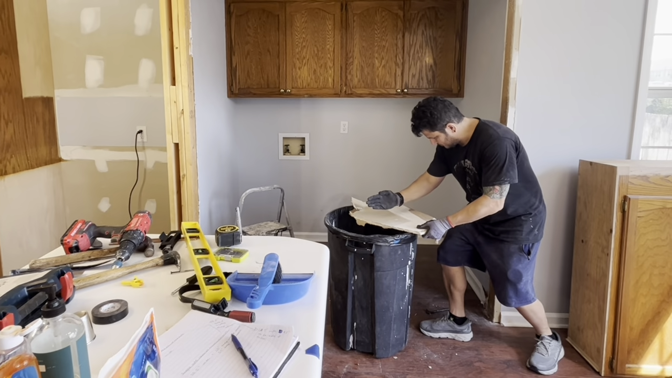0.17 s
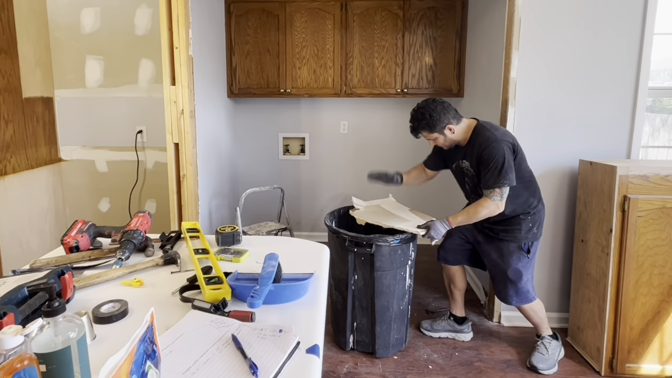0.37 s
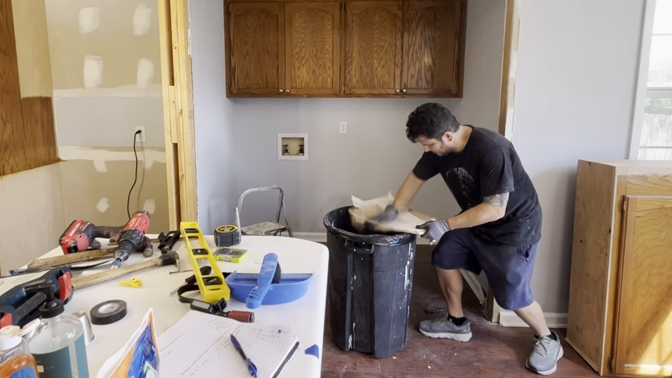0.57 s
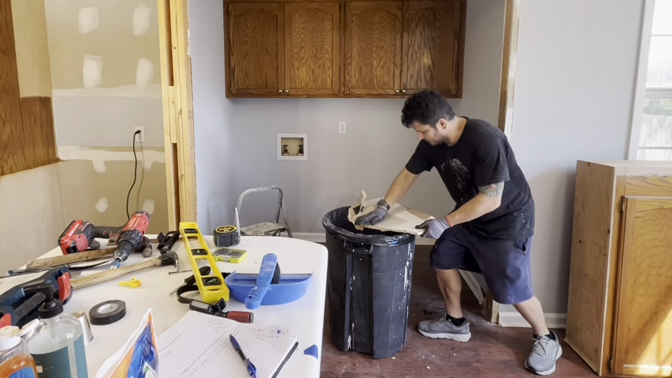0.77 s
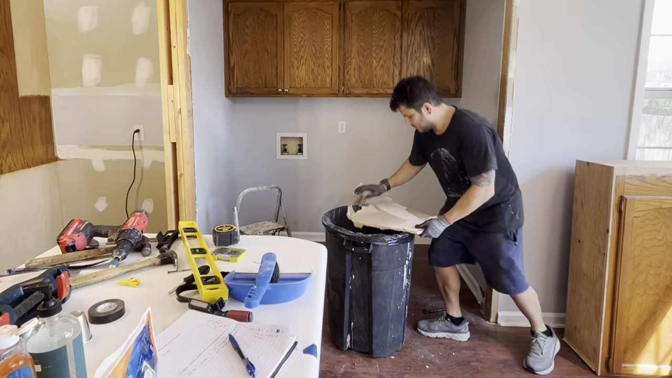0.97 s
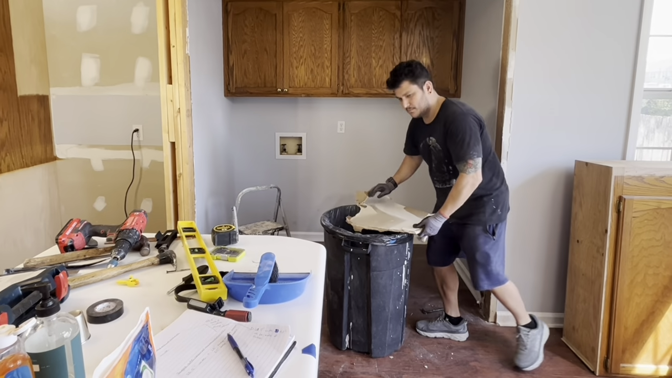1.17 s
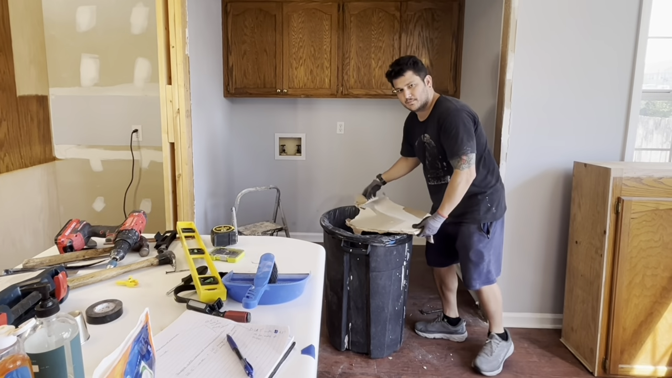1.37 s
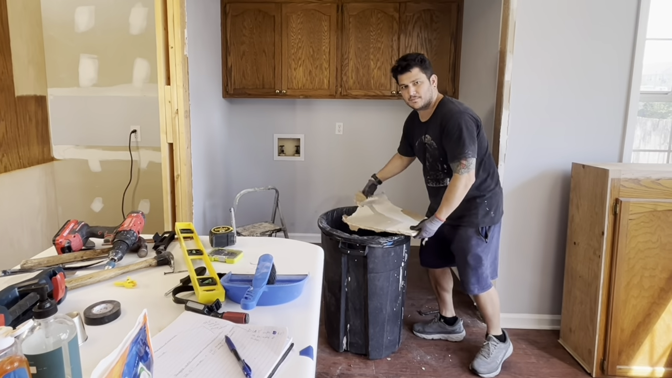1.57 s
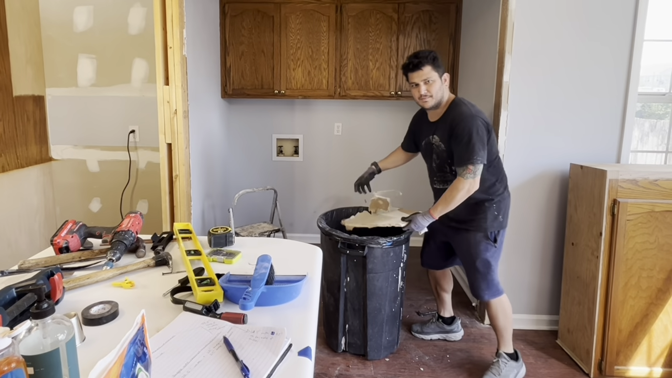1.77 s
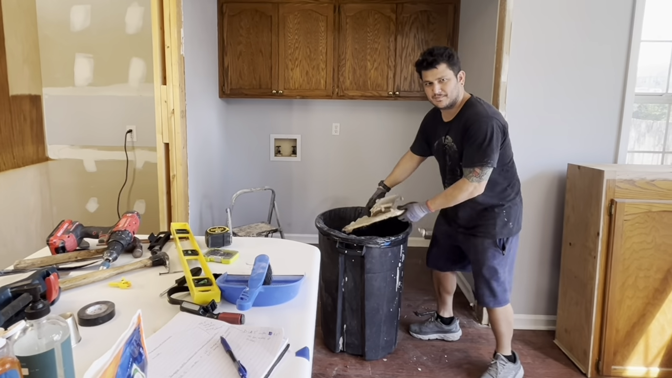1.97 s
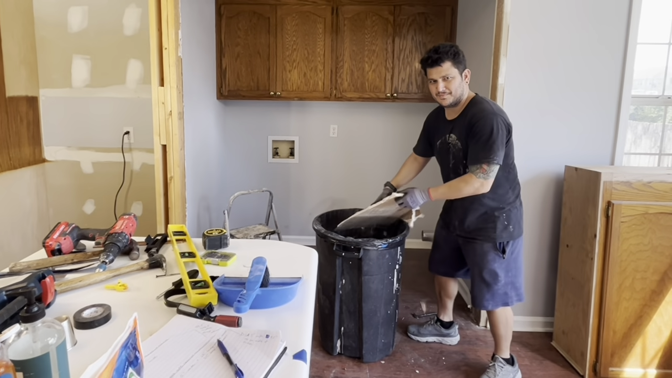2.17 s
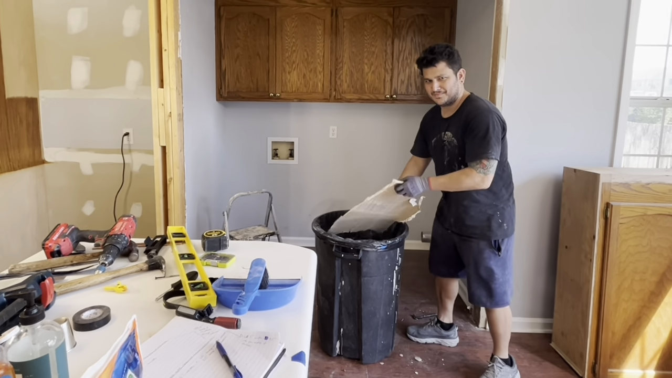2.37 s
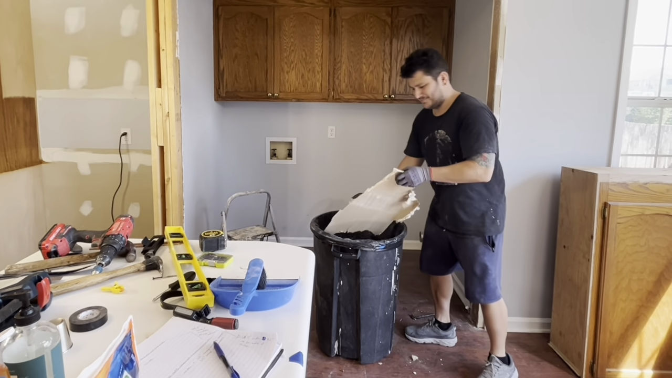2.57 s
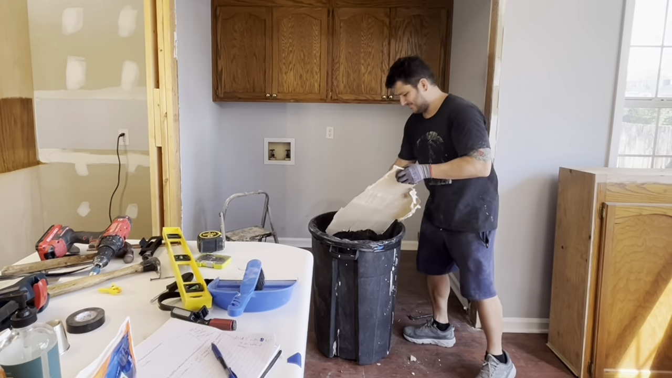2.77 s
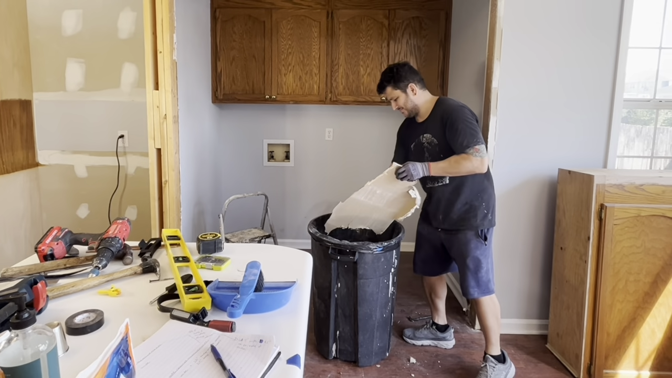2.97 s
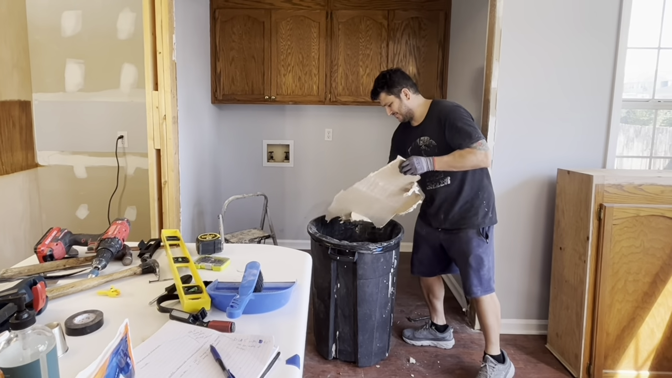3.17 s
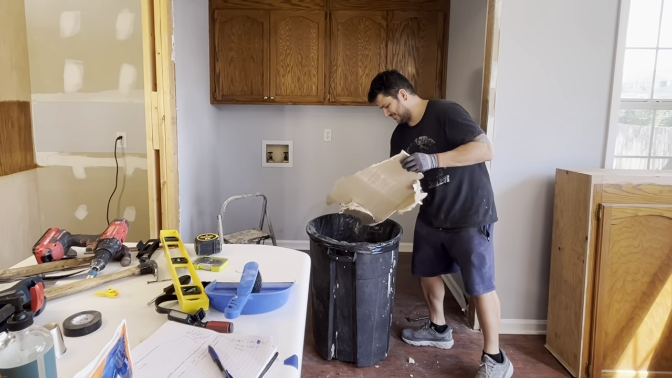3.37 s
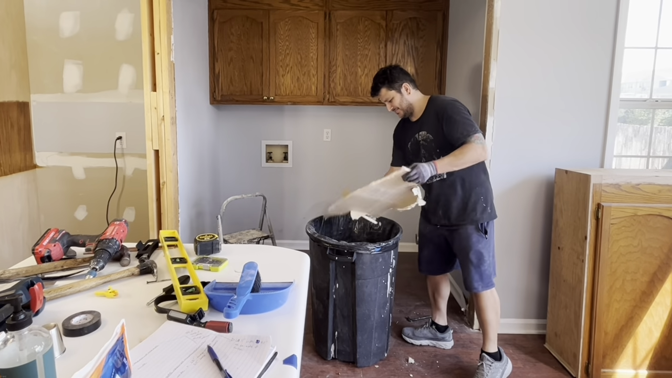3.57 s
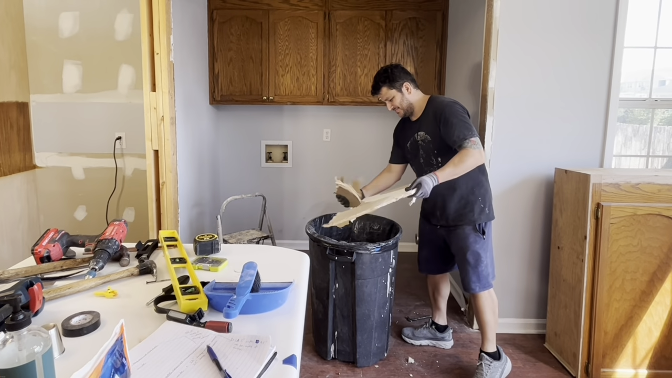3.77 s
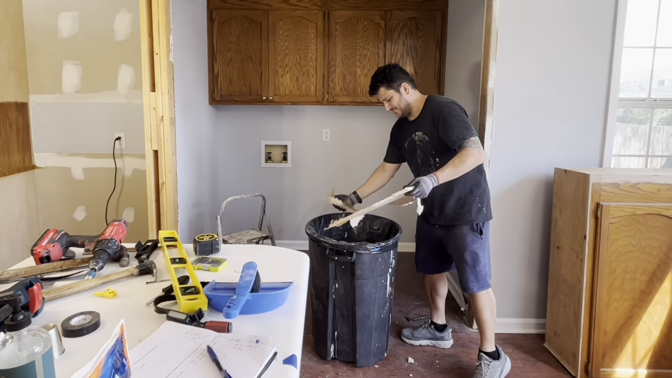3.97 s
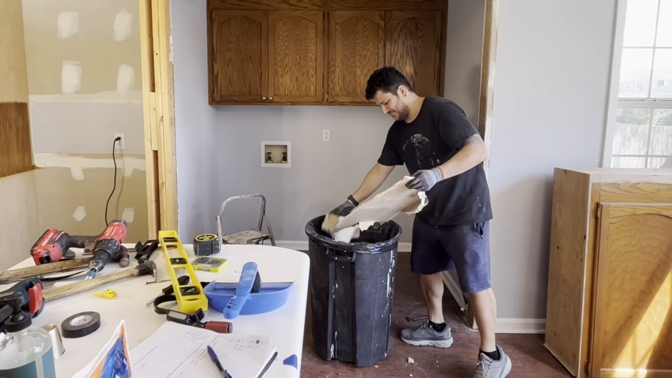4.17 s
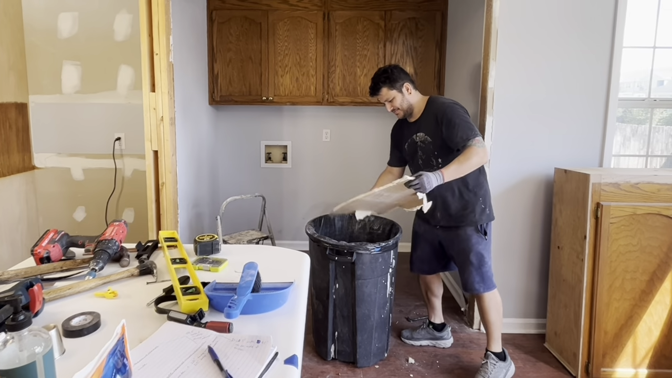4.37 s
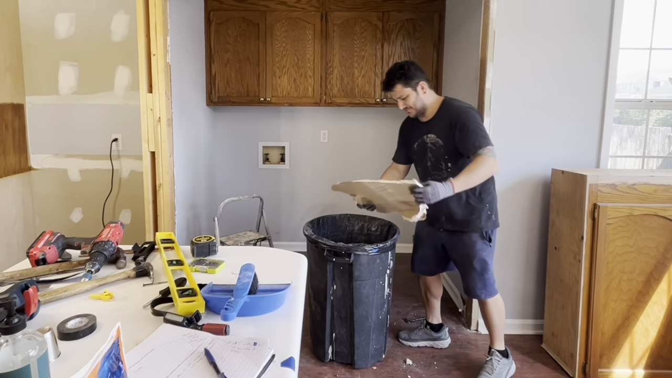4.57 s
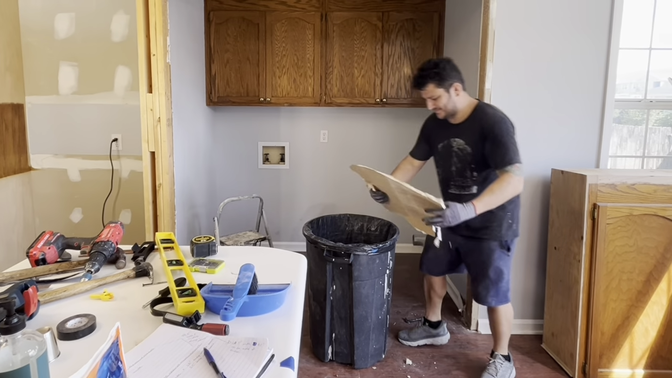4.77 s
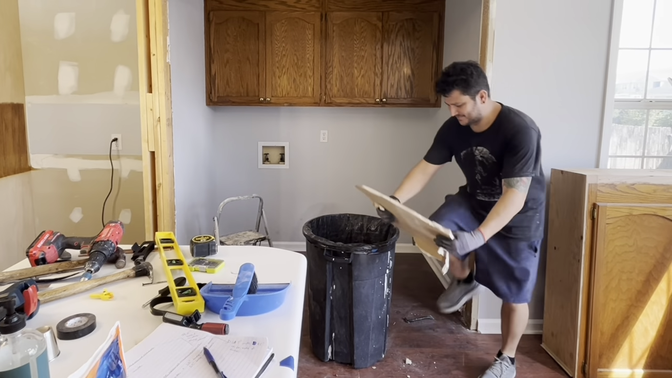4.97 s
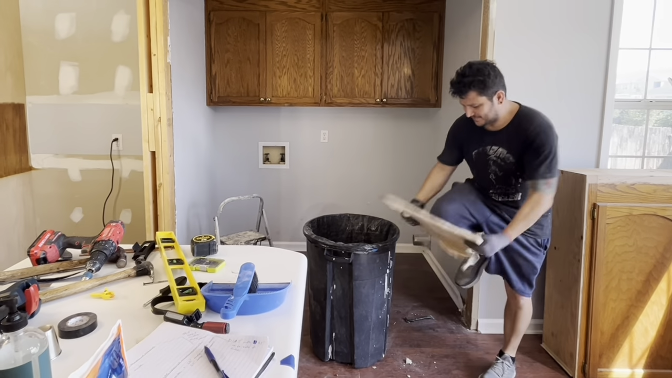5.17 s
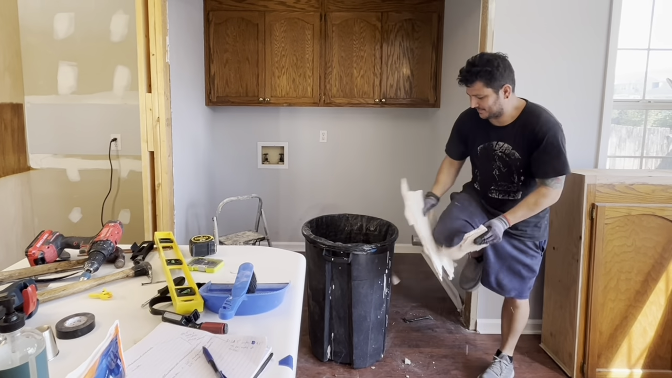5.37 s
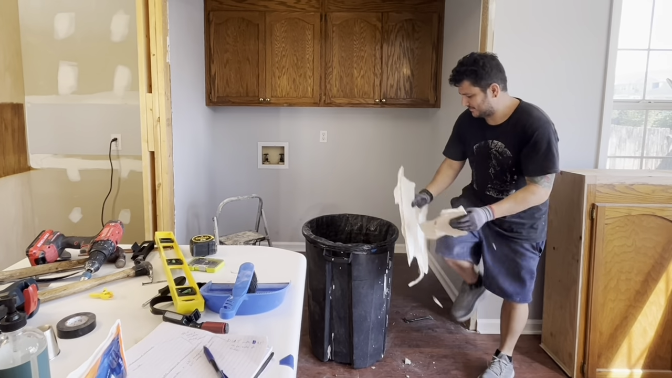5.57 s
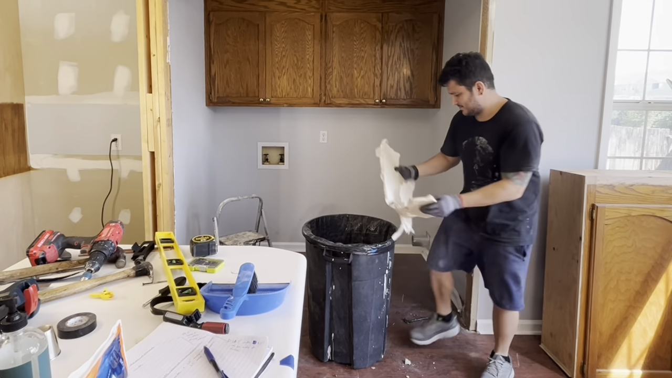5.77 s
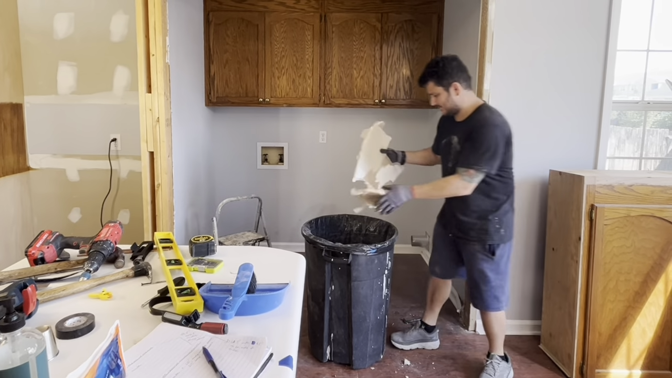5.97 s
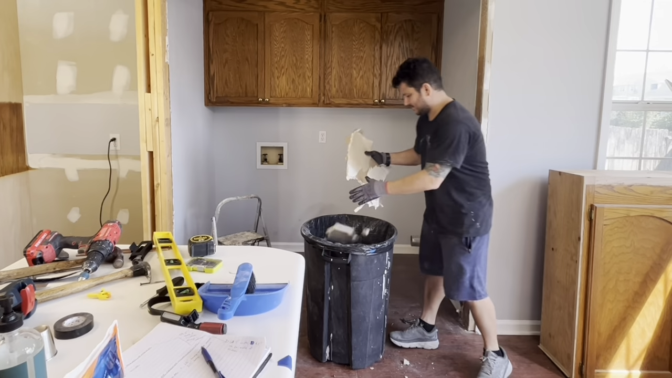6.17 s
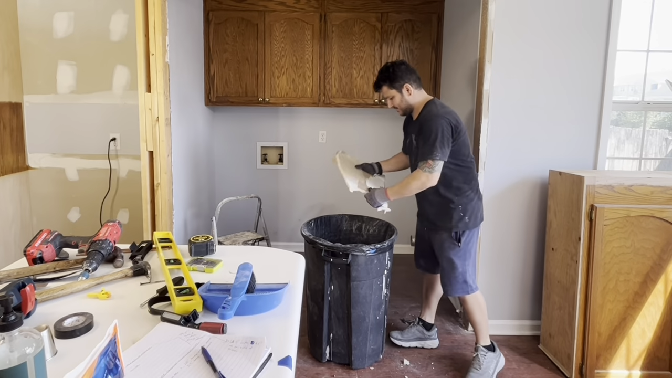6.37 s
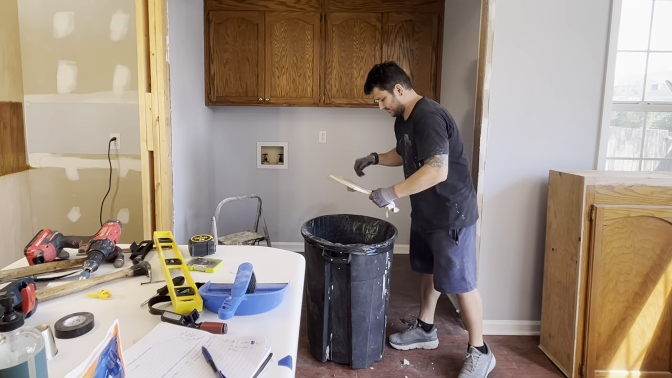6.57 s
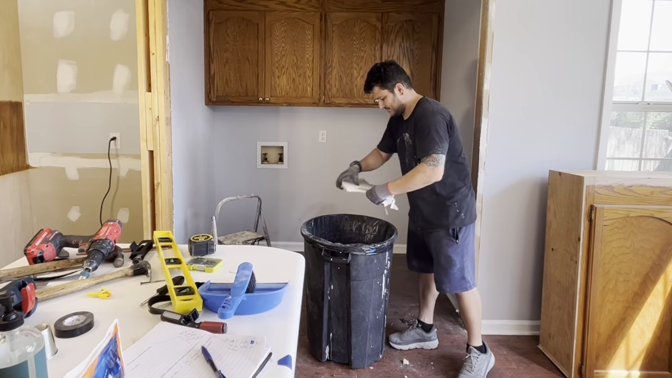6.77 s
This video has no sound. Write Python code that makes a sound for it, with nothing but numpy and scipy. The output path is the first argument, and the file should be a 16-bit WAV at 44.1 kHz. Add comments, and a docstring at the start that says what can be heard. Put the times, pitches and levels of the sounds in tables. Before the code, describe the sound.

A bare kitchen with lively echoes and a faint low rumble of air, heard from a few steps away. After near quiet, a drywall board slaps a plastic trash can at 0.5 s, with a hollow low boom and loose rubble. Weaker knocks, small cracks and gritty scrapes continue from 0.7 to 1.9 s. A deeper thump at 2.0 s leads into a rough stick-slip judder with a thin squeak until about 2.25 s, then knocks and dry cracks to 2.65 s. Quiet paper hiss and grit fill 2.75 to 3.9 s. Several dull thuds cluster at 4.25 to 4.5 s with a scrape. The loudest hard snaps come at 5.1 and 5.3 s, shedding chips; a crumbly crack follows at 5.65 s. Around 6.25 s comes a heavy, clustered thud with rubble and scraping, fading into a soft papery rub and a tiny crack at 6.8 s.

```python
"""Drywall is slapped down into a plastic trash can, dragged out over the rim, snapped across a knee and dropped in.
Each blow flexes the board and rings the modes of the can; loose rubble clatters after it.
Shaped noise bursts make the knocks, cracks and chips of the gypsum; streams of grains make grit and paper hiss.
Stick-slip pulses through resonances make the judder on the rim.
A bare kitchen rings with all of it, over a low rumble of air."""
import sys
import numpy as np
from scipy import signal
from scipy.io import wavfile
from scipy.ndimage import uniform_filter1d

SR = 44100
rng = np.random.default_rng(int(sys.argv[2]) if len(sys.argv) > 2 else 0)


def wav_out(sig):
    """Save sig, one row per channel (or a flat mono array), as 16-bit PCM at SR to the path in sys.argv[1]."""
    wavfile.write(sys.argv[1], SR, np.round(np.clip(np.atleast_2d(sig).T, -1, 1) * 32767).astype(np.int16))


N = 299868
TIME = np.arange(N) / SR
BINS = np.fft.rfftfreq(8192, 1 / SR)  # filter frequencies [Hz]

# the board lands on the can or is struck by hand or knee: (time [s], level [dB], flex pitch [Hz],
# contact time [s], can boom re level [dB], edge knock re level [dB])
BLOWS = [(0.501, -18, 268, 0.0075, 6, -4), (0.727, -31, 245, .012, 5.5, -5.5),
         (0.826, -32.5, 268, 0.0045, 5, -4.5), (0.985, -36.5, 257, .012, 1.5, -12),
         (1.322, -41, 222, 0.0085, 7, -5), (1.678, -30.5, 330, .006, 2.5, -3.5),
         (1.763, -31.5, 280, .012, 4, -3.5), (1.919, -30, 201, .011, -13, -12),
         (1.957, -31.5, 368, 0.00924, 2, -1), (2.036, -20, 136, 0.0136, -3.5, -11),
         (2.086, -29, 432, 0.00606, -8, -4), (2.291, -24.5, 326, 0.012, -8, -10),
         (4.288, -24, 301, 0.015, 4, -4), (4.307, -17, 150, 0.0096, 3.5, -12.5),
         (4.356, -24, 239, 0.014, 0, -5.5), (4.442, -20, 233, .007, -10, -14),
         (4.470, -20.5, 225, 0.00704, -3.5, -18.5), (5.104, -10, 378, 0.0039, -8.5, -13.5),
         (5.134, -17.5, 373, .014, -2.5, -1.5), (5.296, -9.5, 262, 0.0049, -9, -10.5),
         (5.819, -39, 256, 0.0093, 3, -10), (6.227, -13.5, 225.2, .014, -1.5, -8.5),
         (6.241, -13, 114.7, 0.011, -10, -12.5), (6.256, -14, 325.4, 0.00503, -2, -11.5),
         (6.302, -30, 225, 0.015, -1, -11), (6.351, -27.5, 304, .012, -3, -11)]
# bending modes of the board: (multiple of the flex pitch [ratio], level [dB])
BENDS = [(.42, -7.5), (1.002, 4.5), (1.65, -6.5), (2.1, -19.5)]
# wall and air modes of the can: (frequency [Hz], level [dB], t60 [s])
CAN_MODES = [(61.6, -19, 0.48), (78.8, 1.5, 0.22), (97.6, -1, 0.51), (112.3, 1, 0.43), (152.6, -2, 0.24),
             (183.4, 3, 0.34), (223, 0, 0.29), (243.7, -8, 0.59), (279.7, -1.5, 0.21), (341.8, 0, 0.32),
             (403.4, -6, 0.48), (452.5, -7.5, 0.16), (492, -16, 0.55), (710, -10.5, 0.34), (785, -8, .3),
             (950, -30, .3)]
# shares of the contact time: the wait before the board flexes, and the swell of that flex
LAG_SHARE, SWELL_SHARE = 0.4736, 0.42
# after each blow the board drops back once
REBOUND_S, REBOUND_DB = .066, -17.5
# spectrum of rubble shifting under a blow: (frequency [Hz], density [dB per Hz])
RUBBLE_SPECTRUM = [(50, -39), (90, -16), (150, -12), (220, -1.5), (480, 4.5), (620, -8), (1100, -6.5),
                   (2000, -30), (6000, -72)]

# the gypsum core cracks or chips, in the open or hidden behind can and body: (time [s], level [dB],
# corner pitch [Hz], treble slope [dB per octave], crumbling time [s], room re direct sound [dB])
CRACKS = [(.937, -28, 754, -9, 0.0034, -8), (1.233, -46, 690, -21, .0025, -4),
          (1.349, -38.5, 2220, -16, .017, -3.5), (1.533, -38, 2200, -11, .004, -4),
          (2.28, -31, 2480, -17, 0.0023, -16), (2.303, -28, 750, -28, .018, -5),
          (2.371, -23.5, 716, -15.5, 0.0032, -0.5), (2.639, -31, 707, -12, 0.0037, 0.5),
          (4.227, -37.5, 1150, -8, 0.0058, -6), (4.281, -28, 620, -9.5, 0.0045, 6),
          (4.936, -40, 637, -8.5, 0.011, 2), (4.984, -44.5, 1221, -3.5, 0.0054, 4),
          (5.103, -12, 557, -11.5, 0.0061, -9.5), (5.119, -14, 654, -2.5, 0.0019, 5),
          (5.134, -17.5, 625, -3, 0.011, 5), (5.237, -18.5, 2570, 0.5, 0.0086, -2.5),
          (5.29, -14.5, 716, -11, 0.0036, 0.5), (5.656, -18.5, 870, -7.5, 0.014, -1.5),
          (6.281, -25, 507, -15, 0.0033, -0.5), (6.776, -44, 932, -6, 0.0045, -5)]
# the knock of a blunt edge: corner pitch, treble slope per octave, room re direct sound
EDGE_CORNER_HZ, EDGE_SLOPE_DB, EDGE_ROOM_DB = 687, -6.5, -1
# the chip that every contact sheds: longest fall, level re the contact, crumbling time, room re direct
CHIP_FALL_S, CHIP_DB, CHIP_CRUMBLE_S, CHIP_ROOM_DB = .13, -16, 0.0018, -7.5

# the board slides on rim, glove or rubble:
# (start [s], length [s], level before the mix [dB], paper hiss re level [dB])
STROKES = [(0.699, 0.19, -37.5, -9), (.81, 0.21, -42.5, 3), (0.92, .13, -36, -11.5),
           (1.296, 0.28, -44, -10), (1.511, 0.17, -36.5, -1), (1.642, .34, -41, -3),
           (2.172, .26, -34, -3.5), (2.535, 0.2, -35.5, -10.5), (2.764, .27, -40, 6),
           (3.006, 0.15, -37.5, 3.5), (3.212, 0.18, -45, 5), (3.397, 0.21, -38, 2.5), (3.548, .38, -32, 4),
           (4.15, 0.21, -42, -6), (4.26, 0.26, -29, -3), (5.058, .09, -33, -9.5), (5.856, 0.2, -38, 0.5),
           (6.217, 0.29, -33, -5.5), (6.649, 0.3, -47.5, 2.5)]
# a stroke's speed is an arch: under 1 the skew brings its top forward, a higher power narrows it
STROKE_SKEW, STROKE_POWER = 0.59, 1.01
# the board rustles in the gloves, under and between strokes:
# (start [s], end [s], level before the mix [dB], paper hiss re level [dB])
HOLDS = [(0, 0.052, -52, -11), (.6, 4.87, -53.5, -1.5), (5, 6.4, -50, -1.5)]
# spectrum of grinding gypsum grit: (frequency [Hz], density [dB per Hz])
GRIT_SPECTRUM = [(60, 6), (160, -4.5), (330, 2.5), (600, -2), (900, 6.5), (1700, 3), (2600, -3.5),
                 (4300, -18), (6500, -25), (14000, -69)]
# spectrum of the hissing paper face: (frequency [Hz], density [dB per Hz])
HISS_SPECTRUM = [(500, -27), (2000, 2.5), (4200, 3), (6500, -0.5), (10000, -4), (13000, 1), (15000, 0)]

# the edge juddering up the rim:
# (time [s], level before the mix [dB], mean slip rate [per s], squeak pitch [Hz])
JUDDER = [(1.97, -40, 67.5, 4040), (2.04, -30.5, 80, 4530), (2.091, -25, 92, 4200), (2.148, -28, 120, 4430),
          (2.21, -25, 200, 5130), (2.26, -67, 98, 5100)]
# resonances of the juddering board: (frequency [Hz], half the width of each filter pass [Hz], level [dB])
BOARD_RESONANCES = [(480, 110, 0.5), (1110, 135, 4), (1314, 300, 4), (1700, 460, -1)]

# first reflections from floor, wall and cabinets: (delay [s], gain [ratio])
ECHOES = [(.0042, 0.13), (.0075, 0.26), (0.0115, -0.23), (0.02, 0.27), (.031, .25), (.036, -0.23)]
# reverberation of the kitchen: (frequency [Hz], t60 [s])
ROOM_DECAY = [(80, 0.24), (250, 0.5), (600, 0.72), (1200, 0.72), (3500, 0.67), (8000, 0.52), (14000, 0.43)]
# spectrum of the background air: (frequency [Hz], density [dB per Hz])
AIR_SPECTRUM = [(20, -35), (40, -16), (60, 0), (85, -9), (118, -5), (170, -17), (300, -19), (500, -33),
                (1200, -32), (3000, -39), (8000, -43), (15000, -46)]
AIR_DB = -55
# colour of room and microphone: (frequency [Hz], gain [dB])
COLOUR = [(30, -15.5), (65, 2), (100, -3.5), (140, -1), (230, 2), (400, 1.5), (500, -2), (610, -4.5),
          (800, -2), (1100, -1.5), (1900, -1.5), (4200, -2.5), (5600, -6), (6600, -5), (7900, -6),
          (9300, 0), (12000, -8), (14800, -20.5)]
EDGE_HZ = 15000  # upper band limit


def thuds(softness=0.7):
    """The board flexes for a few cycles and sets the can booming; slow blows reach only its low modes."""
    out, t = np.zeros(N), TIME[:SR // 2]
    rings = np.array([(-1) ** k * amp(db - 60 * t / t60) * np.sin(2 * np.pi * hz * t)
                      for k, (hz, db, t60) in enumerate(CAN_MODES)])
    can_hz = np.array(CAN_MODES)[:, 0]
    for s, db, hz, swell, boom_db in flexes():
        bending = sum(amp(level) * np.sin(2 * np.pi * hz * multiple * t) for multiple, level in BENDS)
        flex = t * np.exp(-t / swell) * bending
        mode_drive = 1 / (1 + (softness * swell * can_hz) ** 2)
        can = mode_drive @ rings
        add(out, s, amp(db) * (blow(flex) + amp(boom_db) * blow(can)))
    return out


def flexes():
    """Each blow bends the board just after contact, longer if softer, and once more as it drops back."""
    bends = []
    for s, db, hz, contact, boom_db, _ in BLOWS:
        start, swell = s + LAG_SHARE * contact, SWELL_SHARE * contact
        bends.append((start, db, hz, swell, boom_db))
        bends.append((start + REBOUND_S, db + REBOUND_DB, hz, swell, boom_db))
    return bends


def rubble(rubble_db=-12, settle_s=0.011):
    """Every blow jolts loose pieces, which clatter dully and settle."""
    jolts, t = np.zeros(N), TIME[:SR // 4]
    for s, db, *_ in flexes():
        clatter = np.exp(-t / settle_s) * grains(len(t), per_s=600, spread_db=5, dust=0.28)
        add(jolts, s, amp(db) * blow(clatter))
    shape_db = read(RUBBLE_SPECTRUM, BINS)
    return amp(rubble_db) * tint(jolts, shape_db) / np.sqrt(np.mean(amp(shape_db) ** 2))


def knocks(rise=0.31, build_s=0.0012, ring_db=4, ring_octaves=0.074, bass_slope_db=25):
    """A contact crumbles away into the room; smaller pieces ring higher, each with its own treble slope."""
    out, t = np.zeros(N), TIME[:SR // 6]
    for s, db, hz, slope_db, crumble, room_db in contacts():
        force = np.exp(-t / crumble) * (1 - np.exp(-t / (rise * crumble)))
        burst = blow(force * grains(len(t), per_s=2000, spread_db=1.5, dust=0.41))
        heard = amp(room_db) * blow(tail(build_s + crumble / 2))
        add(heard, 0, reflected(burst))
        octaves = np.log2((BINS + 1) / hz)  # above the corner pitch
        shape_db = slope_db * np.maximum(octaves - .4, 0) + bass_slope_db * np.minimum(octaves, 0)
        # the piece's first modes stand out
        shape_db += ring_db * np.exp(-((octaves - .3) / ring_octaves) ** 2)
        add(out, s, amp(db) * tint(heard, shape_db) / np.sqrt(np.mean(amp(shape_db) ** 2)))
    return out


def contacts():
    """Cracks, and the edge knock opening every blow; each sheds a chip that lands later and rings higher."""
    hits = list(CRACKS)
    for s, db, _, contact, _, edge_db in BLOWS:
        hits.append((s, db + edge_db, EDGE_CORNER_HZ, EDGE_SLOPE_DB, contact, EDGE_ROOM_DB))
    chips = []
    for (s, db, hz, slope_db, *_), (fall, smallness) in zip(hits, rng.random((len(hits), 2))):
        landing = s + CHIP_FALL_S * np.sqrt(fall)
        chips.append((landing, db + CHIP_DB, hz * 2 ** smallness, slope_db, CHIP_CRUMBLE_S, CHIP_ROOM_DB))
    return hits + chips


def scrapes(grit_db=-2.0, hiss_db=2.0, crumb_db=-10, catch_db=1.67):
    """Gypsum grit grinds and the paper face hisses, both catching unevenly as the board slides."""
    grit_grains = grains(N, per_s=820, spread_db=4.5, dust=0.93)
    grit = amp(grit_db) * unit(tint(grit_grains, read(GRIT_SPECTRUM, BINS))) + amp(crumb_db) * crumbs()
    paper_grains = grains(N, per_s=2500, spread_db=1.5, dust=0.83)
    hiss = unit(tint(paper_grains, read(HISS_SPECTRUM, BINS)))
    grinding, brushing = rubbing()
    out = grinding * grit + amp(hiss_db) * brushing * hiss
    return shimmer(out, patch_db=3.0) * amp(catch_db * wander(N, per_s=78))


def rubbing(grip_s=0.094):
    """Gains of grit and of paper over time: arched strokes above the steady rustle of holding."""
    moves = []
    for s, length, db, paper_db in STROKES:
        u = np.clip((TIME - s) / length, 0, 1)
        moves.append((amp(db) * abs(np.sin(np.pi * u ** STROKE_SKEW)) ** STROKE_POWER, paper_db))
    for start, end, db, paper_db in HOLDS:
        grip = np.clip(np.minimum(TIME - start, end - TIME) / grip_s + 1, 0, 1)
        moves.append((amp(db) * grip, paper_db))
    grit_gain = np.sqrt(sum(g ** 2 for g, _ in moves))
    paper_gain = np.sqrt(sum((g * amp(paper_db)) ** 2 for g, paper_db in moves))
    return grit_gain, paper_gain


def crumbs(ring_s=0.00079, count=300):
    """Now and then a larger crumb ticks, each a short decaying sine at its own pitch."""
    out, t = np.zeros(N), TIME[:SR // 100]
    for when, pitch, size in rng.random((count, 3)):
        hz = 1000 * 4.5 ** pitch
        add(out, when * TIME[-1], size * np.exp(-t / ring_s) * np.sin(2 * np.pi * hz * t))
    return unit(out)


def shimmer(x, patch_db):
    """The colour shifts in random patches of time and frequency as the points of contact change."""
    z = signal.stft(x, SR, nperseg=512)[2]
    field = uniform_filter1d(rng.standard_normal(z.shape), size=9, axis=0)
    field = uniform_filter1d(field, size=9, axis=1)
    return signal.istft(z * amp(patch_db * unit(field)), SR, nperseg=512)[1][:len(x)]


def judder(jitter=0.28, squeak_db=-7, overtone_db=-16, pass_width_hz=1600):
    """The edge sticks and slips on the rim; noisy slips ring the board and a squeak of moving pitch."""
    s, *columns = np.transpose(JUDDER)
    t = np.arange(s[0], s[-1], 1 / SR)
    db, rate, hz = (np.interp(t, s, c) for c in columns)
    turns = np.cumsum(rate * (1 + jitter * wander(len(t), per_s=150))) / SR
    slips = (0.36 + np.exp(-(turns % 1) / 0.14)) * rng.standard_normal(len(t))
    board = unit(sum(amp(level) * resonate_twice(slips, f, 2 * w) for f, w, level in BOARD_RESONANCES))
    squeak = unit(resonate_twice(slips, hz, pass_width_hz))
    overtone = unit(resonate_twice(slips, 2 * hz, 2 * pass_width_hz))
    out = np.zeros(N)
    add(out, s[0], amp(db) * (board + amp(squeak_db) * squeak + amp(overtone_db) * overtone))
    return out


def kitchen(x, wet_db, build_s, turns_per_s=1.7, count=3):
    """A sound with its reflections, and reverberation that turns steadily between several diffuse tails."""
    wet = np.zeros(N)
    for k in range(count):
        feed = np.sqrt(2 / count) * np.cos(2 * np.pi * (turns_per_s * TIME + k / count))
        wet += signal.oaconvolve(x * feed, tail(build_s))[:N]
    return reflected(x) + amp(wet_db) * wet


def reflected(x):
    """Direct sound and its first reflections."""
    out = x.copy()
    for delay, gain in ECHOES:
        add(out, delay, gain * x)
    return out


def tail(build_s):
    """Diffuse reverberation of energy 1 that builds up and dies band by band."""
    hz, t = np.fft.rfftfreq(512, 1 / SR), TIME[:SR * 2 // 3:256]
    z = rng.standard_normal((len(hz), 2 * len(t))).view(complex)
    decay = np.exp(-np.log(1000) * t / read(ROOM_DECAY, hz)[:, None])
    ring = signal.istft(z * decay, window="cosine")[1]
    ring *= 1 - np.exp(-TIME[:len(ring)] / build_s)
    return ring / np.sqrt(np.sum(ring ** 2))


def room_air():
    """A low rumble of air: steady noise shaped by its spectrum."""
    return amp(AIR_DB) * unit(tint(rng.standard_normal(N), read(AIR_SPECTRUM, BINS)))


def grains(count, per_s, spread_db, dust):
    """Crumbs of uneven size breaking loose, over a bed of fine dust."""
    bed = rng.standard_normal(count)
    at = np.flatnonzero(rng.random(count) < per_s / SR)
    size = np.minimum(rng.standard_exponential(count)[at], 4)
    clicks = np.zeros(count)
    clicks[at] = np.sign(bed[at]) * amp(spread_db * size)
    return unit(unit(clicks) + dust * bed[::-1])


def wander(count, per_s):
    """A slow random curve: straight lines between per_s normal random points a second."""
    knots = rng.standard_normal(N // 10)
    return np.interp(np.arange(count) * per_s / SR, np.arange(len(knots)), knots)


def resonate(x, hz, width):
    """A resonance of gain 1 whose pitch may follow a curve: shift to 0 Hz, smooth, shift back."""
    turn = np.exp(2j * np.pi * np.cumsum(hz * np.ones(len(x))) / SR)
    r = np.exp(-np.pi * width / SR)
    return 2 * (turn * signal.lfilter([1 - r], [1, -r], x / turn)).real


def resonate_twice(x, hz, width):
    """Two passes of one resonance, for steeper skirts."""
    return resonate(resonate(x, hz, width), hz, width)


def tint(x, db):
    """Causal minimum-phase filter with the gain db at BINS."""
    log_gain = np.log(amp(np.maximum(db, -100)))
    circle = np.concatenate([log_gain, log_gain[-2:0:-1]])
    taps = np.fft.ifft(np.exp(np.conj(signal.hilbert(circle)))).real[:len(BINS)]
    return signal.oaconvolve(x, taps)[:len(x)]


def read(points, hz):
    """Reads a table on a log-frequency axis."""
    f, value = np.transpose(points)
    return np.interp(np.log(hz + 1), np.log(f), value)


def add(mix, s, sound):
    """Mixes a sound in at time s."""
    part = mix[round(s * SR):][:len(sound)]
    part += sound[:len(part)]


def amp(db):
    """Decibels to gain."""
    return 10 ** (np.asarray(db) / 20)


def unit(x):
    """Scales to rms 1."""
    return x / np.sqrt(np.mean(x ** 2) + 1e-20)


def blow(x):
    """Scales to the energy of 10 ms at rms 1."""
    return x * np.sqrt(.01 * SR / (np.sum(x ** 2) + 1e-20))


def scene():
    """All the handling in the room, over a low rumble of air."""
    heavy = kitchen(thuds() + rubble(), wet_db=-1.0, build_s=0.0024)
    sliding = kitchen(scrapes() + judder(), wet_db=-4.5, build_s=0.021)
    return (heavy + knocks() + amp(-4.5) * sliding + room_air())[None]


def record(dry, ceiling=1.0):
    """Colour of room and microphone, softly rounded peaks and the band limit."""
    coloured = tint(dry[0], read(COLOUR, BINS))
    rounded = ceiling * np.tanh(coloured / ceiling)
    band_limit = signal.firwin(255, EDGE_HZ, window=("kaiser", 9), fs=SR)
    return signal.oaconvolve(rounded, band_limit, "same")[None]


dry = scene()
out = record(dry)
wav_out(out)
```